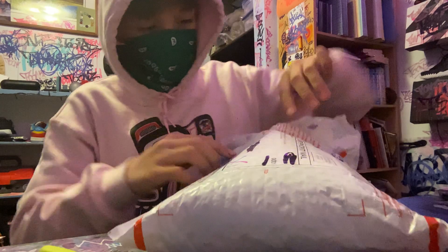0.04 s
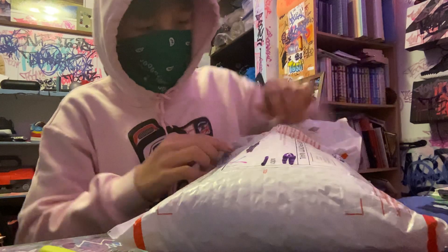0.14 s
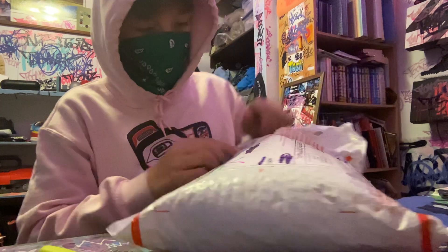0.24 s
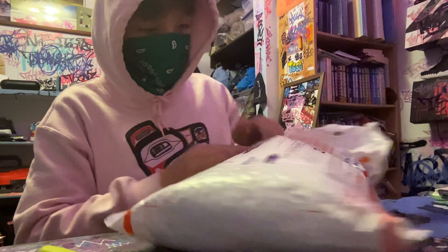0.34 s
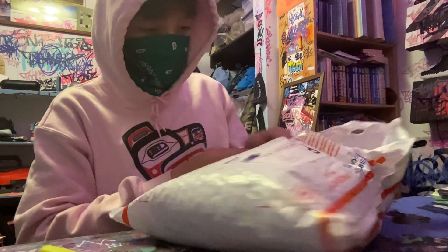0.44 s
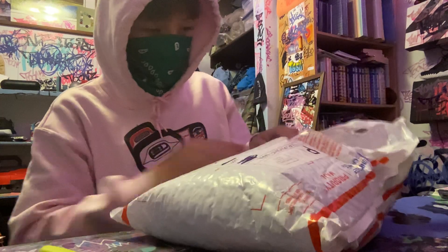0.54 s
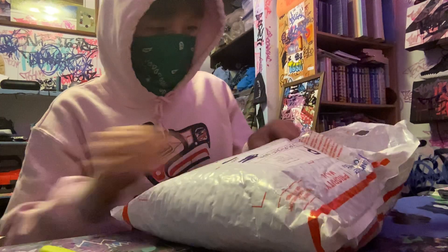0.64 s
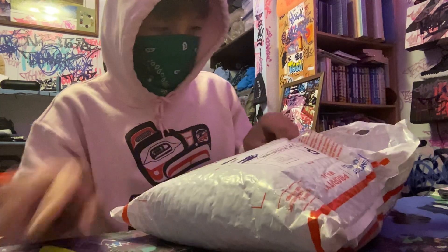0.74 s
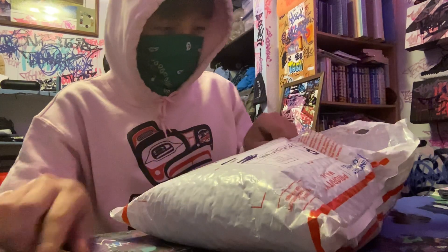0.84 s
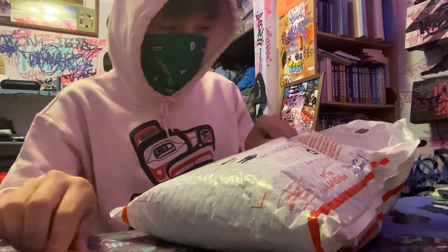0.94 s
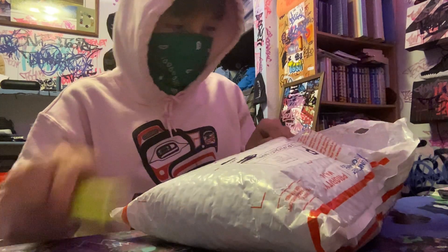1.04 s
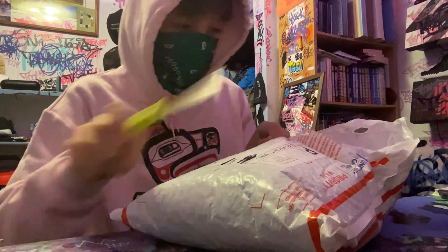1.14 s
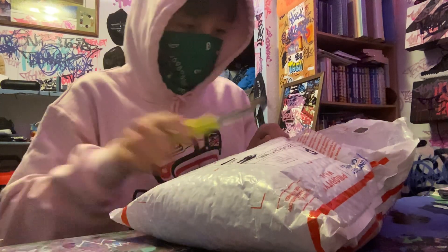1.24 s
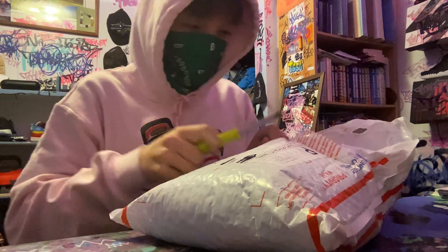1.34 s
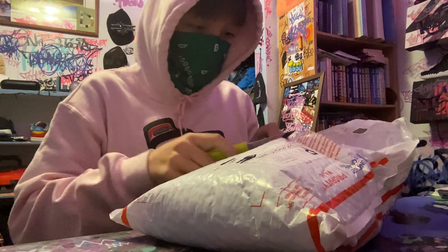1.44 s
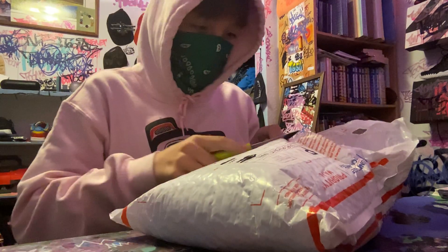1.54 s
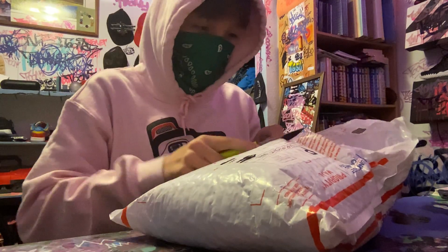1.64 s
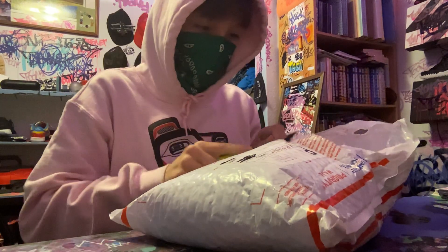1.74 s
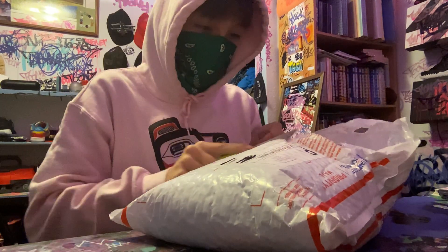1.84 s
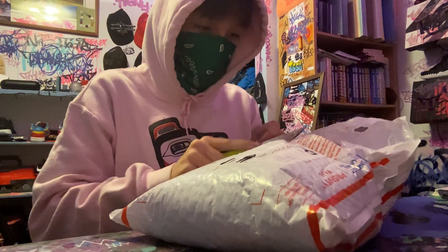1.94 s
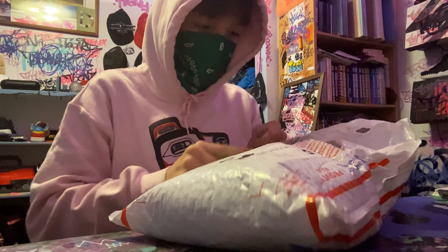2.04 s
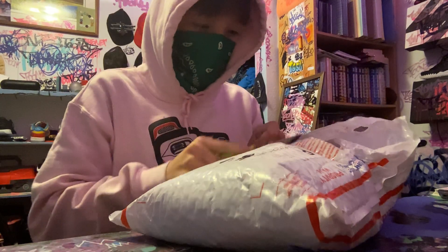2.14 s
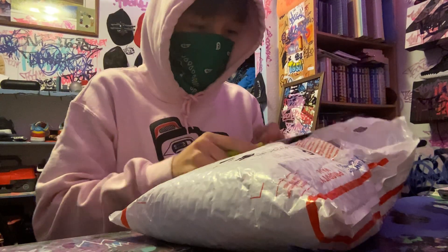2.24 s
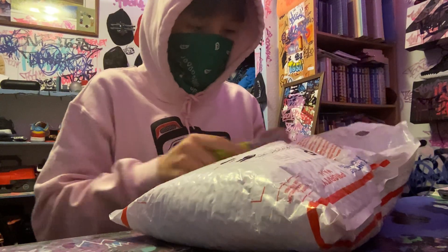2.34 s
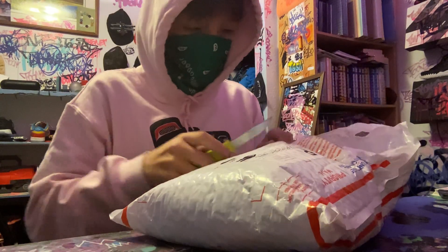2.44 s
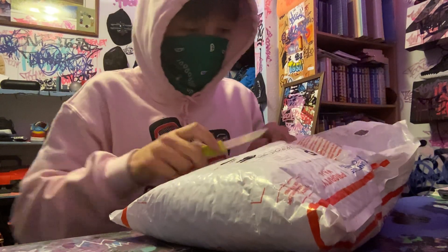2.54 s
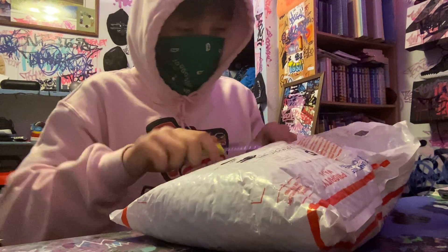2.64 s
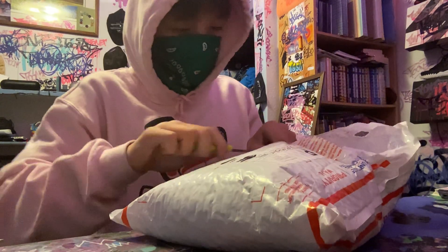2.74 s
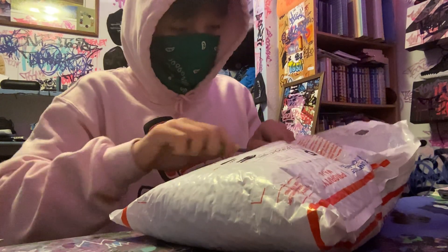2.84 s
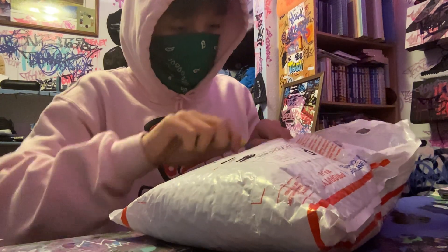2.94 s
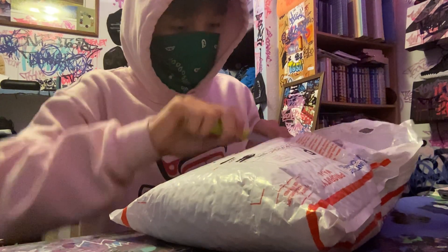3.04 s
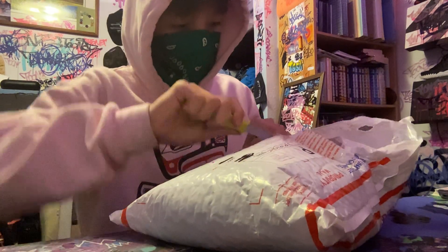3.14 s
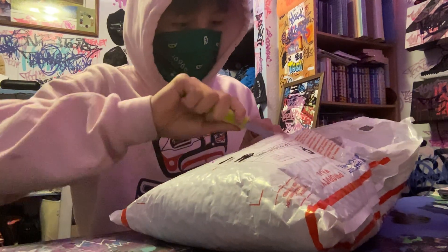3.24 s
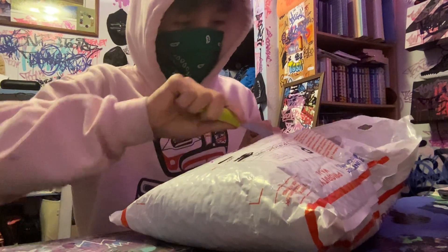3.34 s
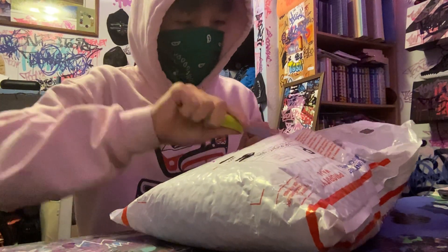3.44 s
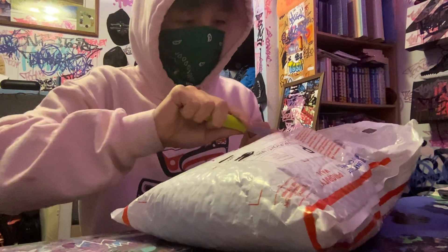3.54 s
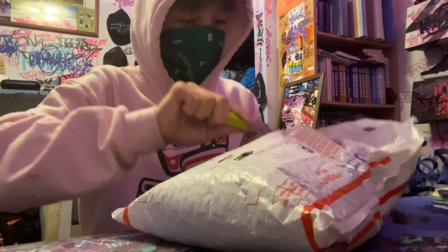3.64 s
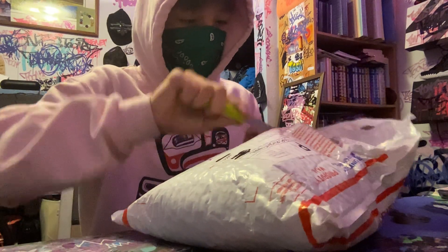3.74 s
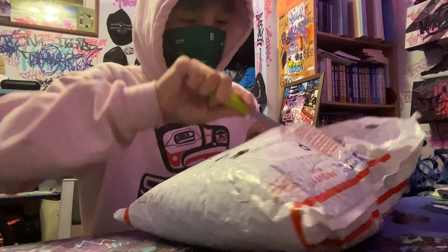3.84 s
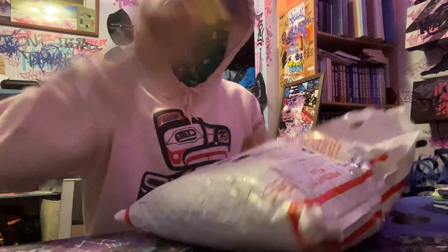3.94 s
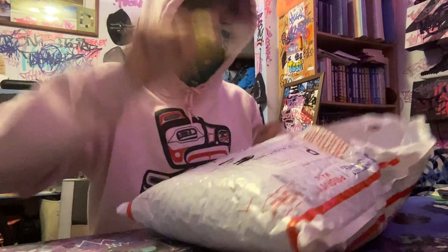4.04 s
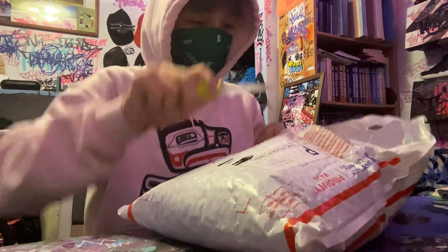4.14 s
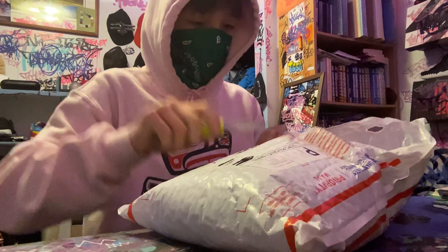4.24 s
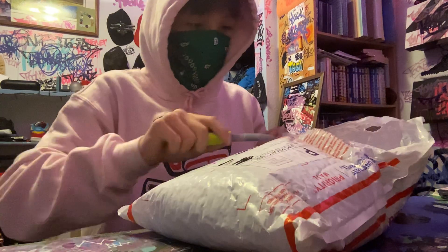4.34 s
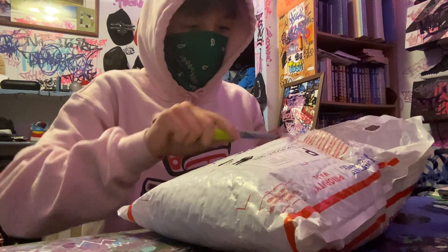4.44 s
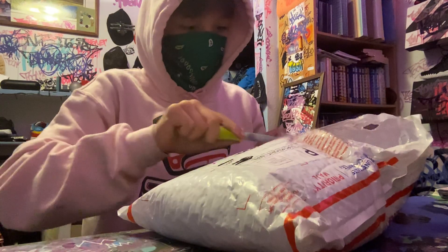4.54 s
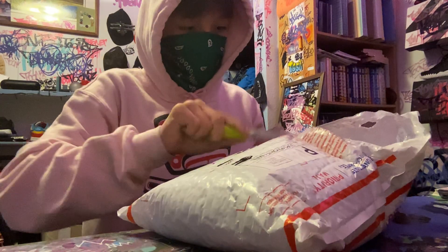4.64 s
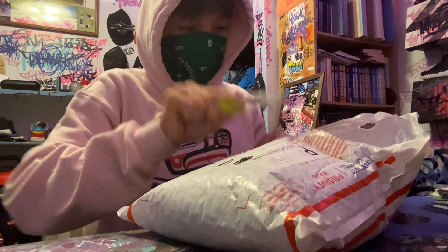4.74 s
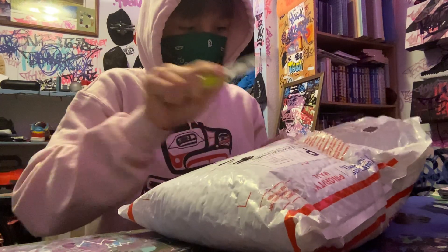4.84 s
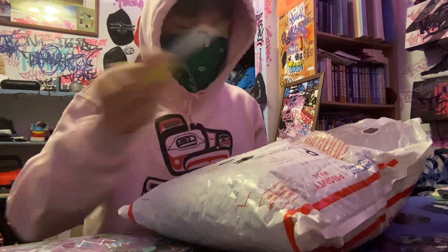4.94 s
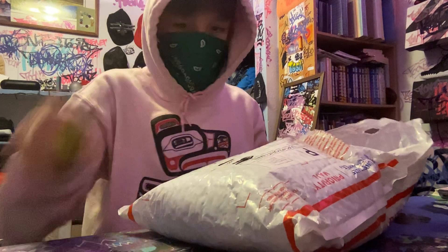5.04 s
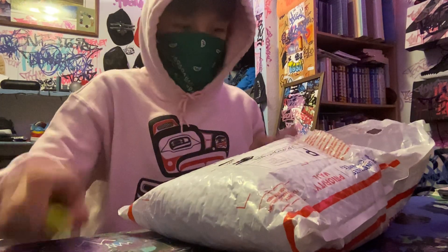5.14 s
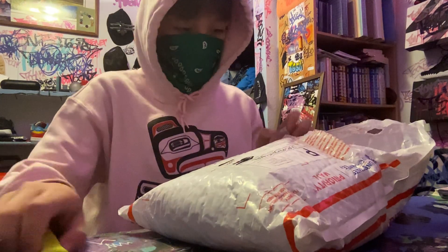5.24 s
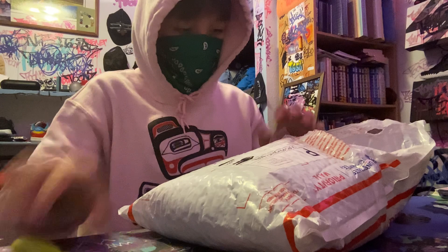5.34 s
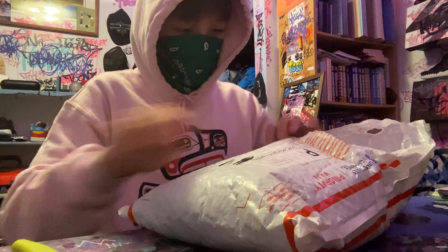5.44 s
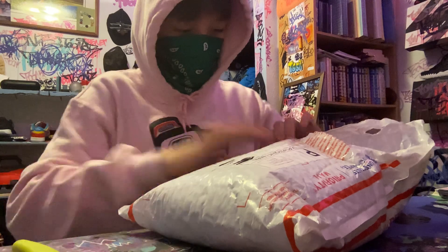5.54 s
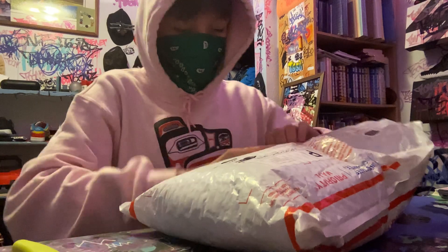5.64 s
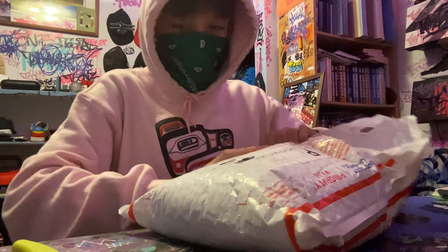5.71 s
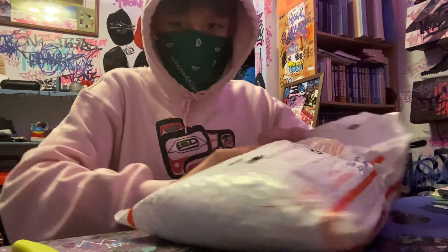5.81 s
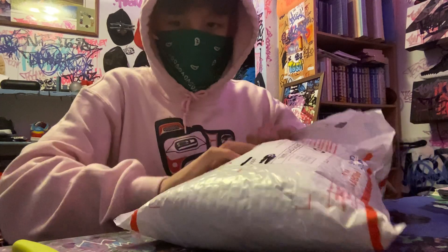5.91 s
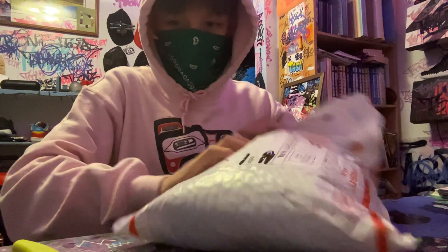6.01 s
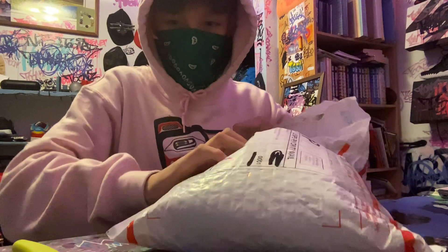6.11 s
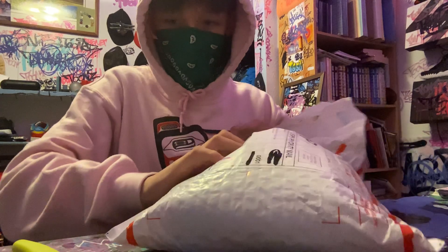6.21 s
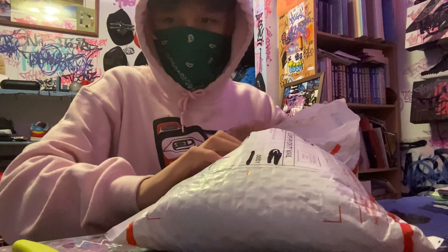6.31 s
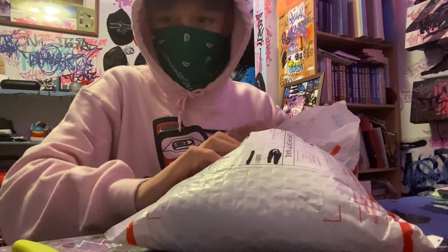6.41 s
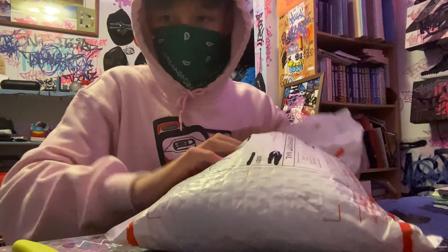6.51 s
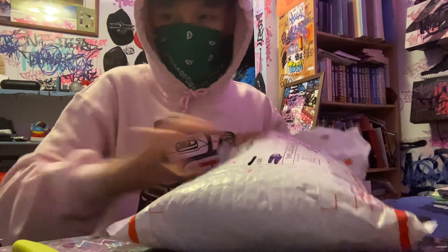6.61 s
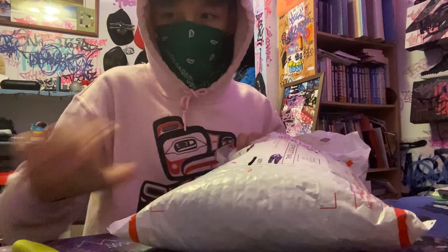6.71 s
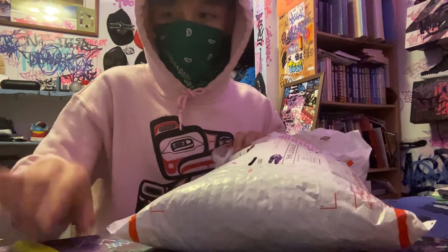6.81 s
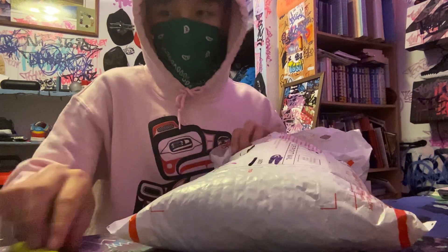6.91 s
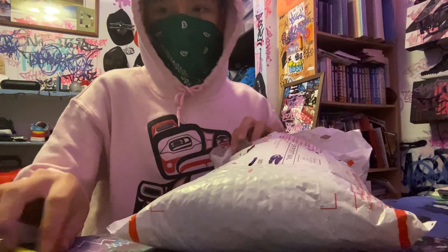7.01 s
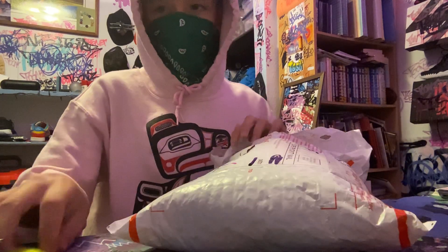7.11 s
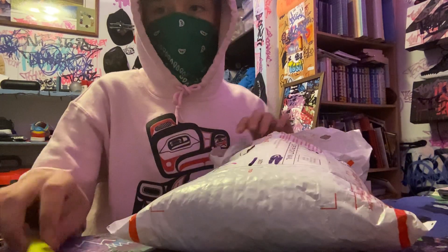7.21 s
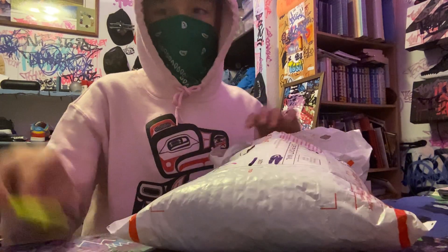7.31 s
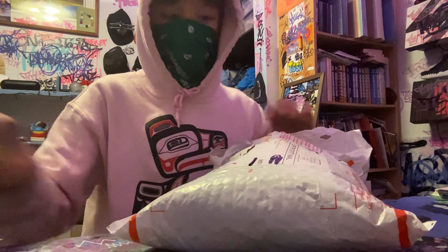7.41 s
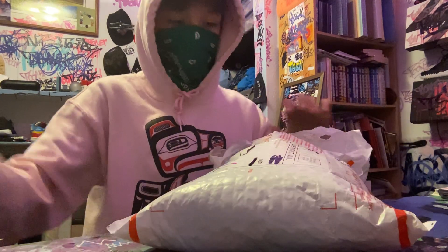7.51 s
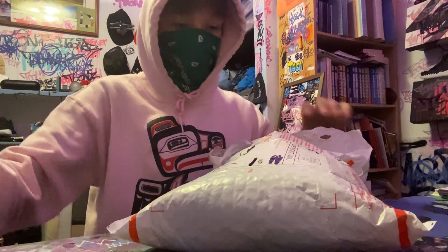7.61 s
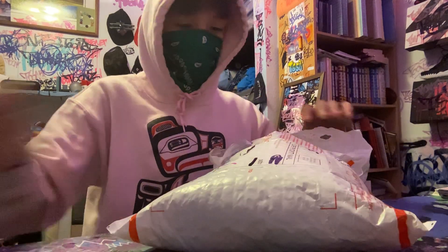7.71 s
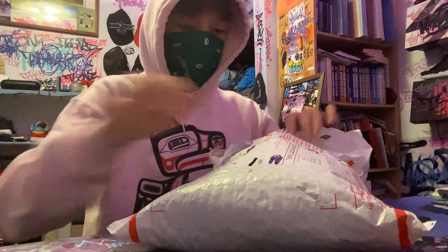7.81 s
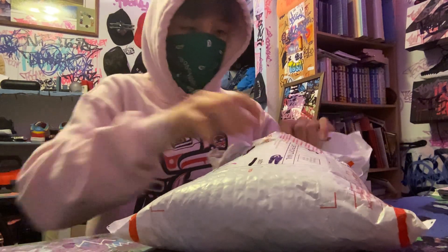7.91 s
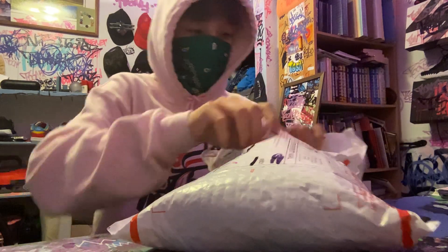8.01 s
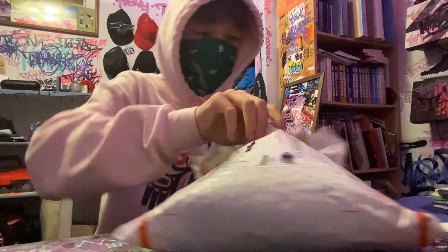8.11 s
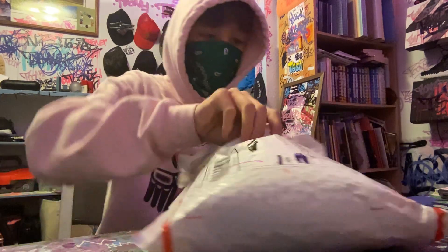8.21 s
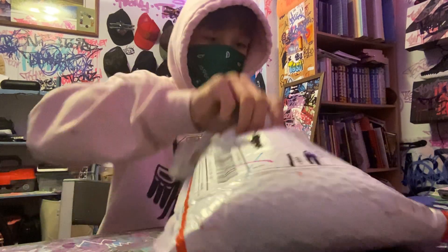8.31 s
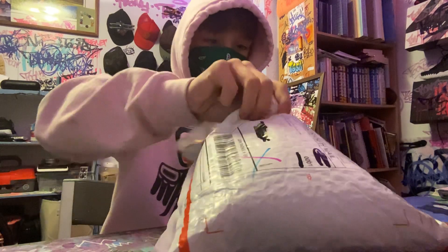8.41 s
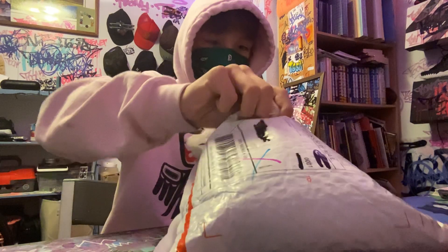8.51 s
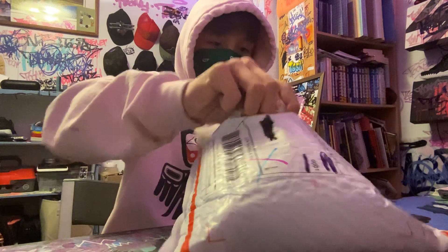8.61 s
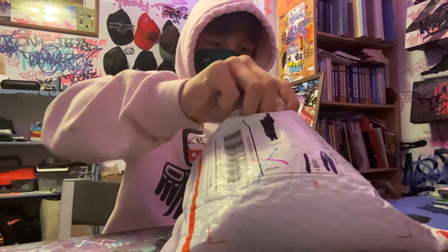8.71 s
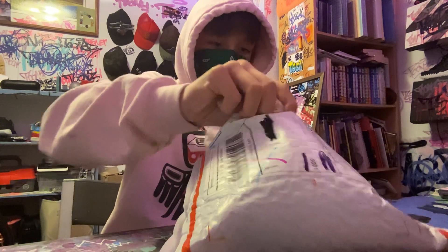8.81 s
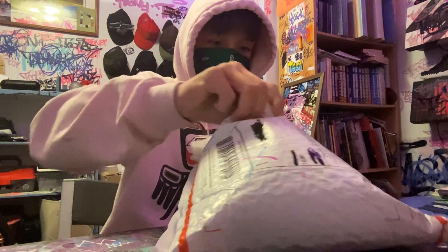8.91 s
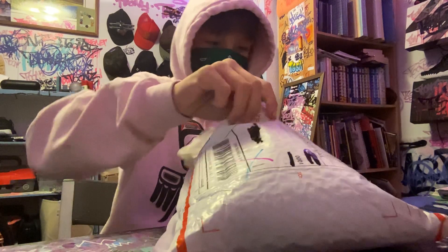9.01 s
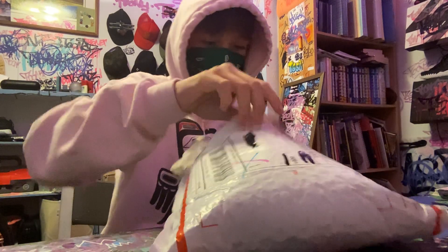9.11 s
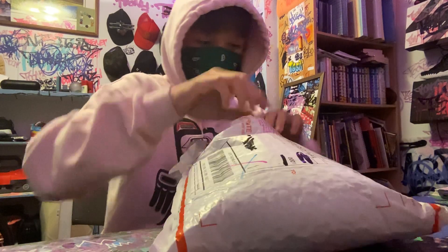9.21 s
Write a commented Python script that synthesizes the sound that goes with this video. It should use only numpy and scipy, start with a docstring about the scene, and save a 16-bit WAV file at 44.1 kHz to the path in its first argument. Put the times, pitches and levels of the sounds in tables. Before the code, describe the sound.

A padded plastic mailer crinkles and snaps under handling on a desk, a knife clatters down, then the film is pulled in louder crackling bursts.

```python
"""A padded plastic mailer is handled on a desk in a small room, close to the microphone.
Its film crinkles as many tiny ringing buckles, snaps in noise bursts, hisses under strokes and knocks.
A knife clatters on the desk as cracks with blurred rings, then slides and scrapes in shaped noise.
Soft landings boom in the desk top; room reflections and a faint steady air noise lie behind."""
import sys
import numpy as np
from scipy import signal
from scipy.fft import rfft, irfft, next_fast_len
from scipy.io import wavfile
from scipy.ndimage import map_coordinates

SR = 44100
rng = np.random.default_rng(int(sys.argv[2]) if len(sys.argv) > 2 else 0)


def master_out(mix):
    """Clip the mix to full scale and print it as 16-bit PCM to the path in sys.argv[1]."""
    frames = np.transpose(np.atleast_2d(mix))
    ceiling = np.clip(frames, -1, 1)
    pcm = np.round(ceiling * 32767).astype(np.int16)
    wavfile.write(sys.argv[1], SR, pcm)


N = 408366
TIME = np.arange(N) / SR
TOP_HZ = 16200  # upper band limit

# Hand or knife briefly pressing the film: [start t/s, length t/s, crinkle drive level/dB, treble re drive level/dB]
GRIPS = [(0, .13, -43, -2), (0.203, 0.37, -43, -5), (0.787, 0.029, -44, -6.5), (1.709, .23, -46, -5.5),
         (1.997, 0.052, -41, -2.5), (2.16, 0.27, -47.5, -5.5), (2.849, 0.24, -53.5, -0.5),
         (3.449, 0.035, -42, 3), (3.611, 0.23, -48, -2), (3.91, .18, -35, -4), (4.227, .43, -51.5, -4.5),
         (4.895, 0.12, -51.5, -5), (5.112, 0.15, -48.5, -2), (6.243, 0.22, -42, -5),
         (6.527, 0.13, -36.5, -5), (6.83, 0.18, -56, -3), (7.124, 0.03, -53.5, 13)]
# Film pulled ever tighter: [start t/s, length t/s, final drive level/dB, treble re drive level/dB]
TUGS = [(5.593, 0.35, -32, -4.5), (6.017, 0.024, -22.5, -3.5), (7.887, 0.14, -42, -5.5),
        (8.005, 0.15, -34.5, 0.5), (8.2, 0.19, -29.5, -2.5), (8.435, 0.25, -27.5, -3.5),
        (8.751, 0.046, -31, -7), (8.864, .11, -34, -5.5), (9.024, 0.13, -39.5, -1)]
# Creases popping through and film giving way: [t/s, level/dB, colour f/Hz, t60 t/s (short tick, long crunch)]
SNAPS = [(.199, -37, 2650, 0.012), (.466, -29.5, 2000, 0.012), (.498, -33.5, 3700, 0.012),
         (1.351, -45.5, 2550, .04), (1.712, -38.5, 3900, .023), (1.864, -36.5, 3030, 0.048),
         (2.058, -30, 3150, 0.018), (2.333, -37.5, 3200, 0.12), (2.421, -40, 3770, .04),
         (2.51, -32.5, 2900, 0.017), (2.764, -40.5, 4500, .033), (3.423, -29, 2700, .046),
         (3.766, -31.5, 2200, 0.03), (3.897, -23, 1910, 0.028), (3.907, -15, 1766, 0.026),
         (4.147, -26.5, 2510, 0.02), (4.334, -35.5, 2030, 0.033), (4.51, -38.5, 2080, .02),
         (4.569, -31, 1780, 0.023), (6.013, -25, 1690, .05), (6.28, -29.5, 2780, 0.021),
         (7.51, -39.5, 2200, 0.037), (7.924, -30, 1500, 0.053), (7.978, -29, 1790, 0.033),
         (8.392, -17, 2080, 0.027), (8.5536, -26, 3420, .006), (8.6117, -24.5, 2970, .01),
         (8.795, -23, 1780, .014), (8.9128, -26, 4200, 0.0057), (8.928, -23.5, 2430, .0085),
         (9.0909, -26.5, 3160, 0.015), (9.225, -32, 2180, .024)]
# Palm or sleeve stroking the film: [start t/s, length t/s, level at the middle level/dB]
SWISHES = [(0.236, 0.36, -41), (5.68, 0.31, -38.5), (6.541, .14, -34.5)]
# Finger or knife bumping the taut parcel, or a fold flipping over: [t/s, level/dB, centre f/Hz]
KNOCKS = [(.085, -30.5, 1600), (.529, -25.5, 1900), (1.988, -42.5, 1400), (2.016, -36.5, 1600),
          (2.614, -40, 1500), (2.629, -32.5, 750), (2.972, -32, 1920), (3.018, -29, 1630),
          (3.042, -35, 1200), (4.859, -33.5, 1600), (6.323, -24.5, 1400), (7.608, -32, 1650),
          (8.664, -23.5, 1610)]
# Knife meeting the desk, rocking from handle to blade: [t/s, level/dB, hardness as f/Hz, higher is harder]
CONTACTS = [(0.8037, -20, 1070), (5.113, -29.5, 1380), (5.2129, -30, 1430), (5.3066, -13.5, 1330),
            (5.3125, -12.5, 1800), (5.3164, -10.5, 1900), (5.3809, -23, 1180), (5.3885, -11, 1700),
            (5.4378, -19.5, 1350), (5.444, -17, 2170), (5.4625, -18, 1210), (5.487, -20.5, 1090),
            (6.8569, -24.5, 960), (6.863, -25.5, 2000), (7.0676, -15, 1900), (7.149, -27.5, 1200),
            (7.17, -28, 1100), (7.184, -27, 1300), (7.2341, -29, 1040)]
# Blade scraping or tapping: [start t/s, length t/s, level/dB, centre f/Hz]
SCRAPES = [(0.838, 0.058, -39, 3130), (2.508, 0.019, -42, 5660), (2.663, 0.0045, -45.5, 5960),
           (7.112, 0.046, -38.5, 2390)]
# Handle dragged over the desk: [start t/s, length t/s, level/dB, centre f/Hz]
SLIDES = [(0.841, 0.088, -36.5, 810), (6.856, 0.22, -40.5, 760), (7.065, 0.177, -36.5, 820)]
# Hands, knife and parcel landing on the desk: [t/s, level/dB, centre f/Hz]
THUMPS = [(.806, -28.5, 270), (1.215, -49, 330), (3.902, -28.5, 290), (3.986, -35.5, 130),
          (4.235, -45, 280), (5.308, -32.5, 200), (6.015, -35, 278), (6.866, -37.5, 150), (7.619, -42, 170)]

# Resonances of the steel blade: [f/Hz, width f/Hz, relative level/dB]
BLADE_MODES = [(2740, 580, -2.5), (5400, 490, -5.5)]
# Resonances of knife on desk top: [f/Hz, relative level/dB]
KNIFE_MODES = [(712, -4), (1059, 1.5), (1156, 3), (1340, -4), (1820, -1), (2070, -1), (2960, -5)]
# Resonances of the desk under a soft weight: [f/Hz, relative level/dB, t60 t/s]
BOOM_MODES = [(88, -2, .16), (143, -4, 0.25), (189.6, -4, 0.23), (308.5, 0.5, 0.091)]

# Spectrum of the crinkling film's body: [f/Hz, relative level/dB]
FILM = [(100, -31.5), (400, 0.5), (620, -12), (1000, 4.5), (1450, -2), (2100, 2.5), (3800, -4), (7000, -22),
        (16000, -27.5)]
# Spectrum of the film's treble: [f/Hz, relative level/dB]
FIZZ = [(1500, -5.5), (3800, 6), (5800, 7), (9500, -3.5), (16000, -14)]
# Spectrum of a snapping crease: [f/Hz, relative level/dB]
SNAP = [(150, -4), (1000, 5.5), (2200, 3.5), (4000, -4), (6000, -2.5), (16000, -12)]
# Spectrum of a bump on the taut parcel: [f/Hz, relative level/dB]
TAUT = [(100, -1), (450, 3), (1100, 5), (1600, -1.5), (2300, 1), (5000, -12), (13000, -35)]
# Spectrum of the knife on the desk: [f/Hz, relative level/dB]
KNOCK = [(100, -22), (450, 4), (950, 7), (1550, 0), (1950, 7), (3300, 0), (5200, -7), (16000, -54.5)]
# Spectrum of hollow rumble in stuffing and desk: [f/Hz, relative level/dB]
HOLLOW = [(55, -10), (95, -2.5), (160, -1.5), (420, -2), (620, -10), (1500, -45.5)]
# Spectrum of the background air: [f/Hz, relative level/dB]
AIR = [(60, -2), (1000, -8), (5000, -21), (16000, -43)]
# Decay of the room: [f/Hz, t60 t/s]
ROOM = [(150, 1), (1000, 0.19), (3000, 0.18), (9000, 0.23)]

GRIP_ATTACK_S, GRIP_RELEASE_S = 0.11, 0.29  # time to rise and to fall by 60 dB
TUG_DB_PER_S = 33.5  # growth of the crinkle with the tension
BED_DB, BED_TREBLE_DB = -60.5, -1.5  # quiet bed of crinkle under the moves
BED_DROP_S, BED_DROP_DB = 7.26, -18.5  # the quiet bed drops by this much here and stays lower
# a finger sticks and slips over the taut film in one quick run of knocks
JUDDER_S, JUDDER_GAP_S, JUDDER_DB, JUDDER_HZ = 6.3965, .0072, -14, 1500


def held(start, length):
    """Gain in dB of one move of the hand: quick attack, hold, and a release as the film relaxes."""
    before = np.maximum(start - TIME, 0) / GRIP_ATTACK_S
    after = np.maximum(TIME - start - length, 0) / GRIP_RELEASE_S
    return -60 * np.minimum(before + after, 2)


def handling():
    """Drive of the film in dB, body and treble: the quiet bed, grips and tugs add up in power."""
    bed_db = BED_DB + np.maximum(held(0, BED_DROP_S), BED_DROP_DB)
    moves = [(bed_db, BED_TREBLE_DB)]
    for start, length, db, treble in GRIPS:
        moves.append((db + held(start, length), treble))
    for start, length, db, treble in TUGS:
        slack_db = TUG_DB_PER_S * np.maximum(start + length - TIME, 0)
        moves.append((db - slack_db + held(start, length), treble))
    body = summed([db for db, _ in moves])
    return body, summed([db + treble for db, treble in moves])


def crinkle(level, treble, life=0.0027, spread_db=7, rub=0.72, body_db=-1, fizz_db=-1, count=3):
    """Tiny buckles run through the film in clumps; harder work makes them louder and denser."""
    rate = np.minimum(800 * amp(.7 * (level + 45.5) + 6 * wobble(50)), 3000)  # buckles a second
    pushes = grains(rate, spread_db)
    at = np.flatnonzero(pushes)
    k = np.arange(SR // 220)
    pops = np.zeros(N)
    for _ in range(count):
        # every buckle rings a few small facets for a few milliseconds, each at its own pitch
        hz = 700 * (TOP_HZ / 700) ** rng.random(N)[at, None]
        t60 = life * np.sqrt(TOP_HZ / hz)  # larger, lower facets ring longer
        tone = np.sin(2 * np.pi * hz * k / SR)
        ring = pushes[at, None] * np.sqrt(hz) * tone * amp(-60 * k / SR / t60)
        pops += np.bincount((at[:, None] + k).ravel(), ring.ravel(), N)[:N]
    # fingers and sleeves rubbing the film fill the gaps between buckles
    film = unit(pops) + rub * rng.standard_normal(N)
    body = unit(coloured(film, lambda f: along(FILM, f)))
    fizz = unit(coloured(film, lambda f: along(FIZZ, f)))
    body_gain = amp(level + body_db + 2.52 * wobble(35))
    fizz_gain = amp(treble + fizz_db + 3.2 * wobble(35))
    return amp(1.3 * wobble(22)) * (body_gain * body + fizz_gain * fizz)


def snaps(settle=0.066, settle_db=-17, slope_db=8, ripple_db=3):
    """A crease pops through with a colour of its own, and the film around it settles in smaller ticks."""
    out, t = np.zeros(N), np.arange(SR // 12) / SR
    bands = np.geomspace(SNAP[0][0], TOP_HZ, num=20)
    for s, db, hz, life in SNAPS:
        burst, ticks = rng.standard_normal((2, len(t)))
        crease = np.column_stack([bands, ripple_db * rng.standard_normal(len(bands))])
        # cubing the noise leaves sparse ticks
        settling = unit(ticks ** 3) * np.sqrt(life / settle) * amp(settle_db - 60 * t / settle)
        pop = burst * amp(-60 * t / life) + settling
        colour = lambda f: along(SNAP, f) + along(crease, f) + hump(f, hz * hz / 2200, slope_db)
        add(out, s, blow(coloured(pop, colour), db))
    return out


def judder(count=8, scatter_s=.0011):
    """The uneven slips of a dragging finger as (t/s, level/dB, f/Hz): they build fast and peter out."""
    k = np.arange(count)
    strength = np.sin(np.pi * ((k + .5) / count) ** 0.68)
    scatter = scatter_s * np.sqrt(k / count) * rng.standard_normal(count)
    times = JUDDER_S + JUDDER_GAP_S * k + scatter
    return [(s, JUDDER_DB + 20 * np.log10(a), JUDDER_HZ) for s, a in zip(times, strength)]


def knocks(echo_s=.0028, echo_db=-5, stuffing_db=-32, t60=.1, slope_db=8):
    """A broad, unpitched knock; the desk throws it straight back and the stuffing shivers."""
    out, t = np.zeros(N), np.arange(SR // 8) / SR
    for s, db, hz in KNOCKS + judder():
        push = (t == 0) + amp(stuffing_db - 60 * t / t60) * rng.standard_normal(len(t))
        add(push, echo_s * amp(2 * rng.normal()), amp([echo_db]))  # the delay varies about echo_s
        knock = coloured(push, lambda f: along(TAUT, f) + hump(f, hz, slope_db))
        add(out, s, blow(knock, db))
    return out


def swishes(treble_db=-14):
    """Sliding over the film gives a fine, even hiss that swells and fades with the stroke."""
    out = np.zeros(N)
    colour = lambda f: summed([along(FILM, f), along(FIZZ, f) + treble_db])
    for s, length, db in SWISHES:
        hiss = unit(coloured(rng.standard_normal(round(length * SR)), colour))
        add(out, s, amp(db) * hiss * signal.windows.cosine(len(hiss)))
    return out


def padding(level, low_db=-54.5, follow=0.5):
    """The stuffed parcel rumbles softly as it is pushed about, following half the film's dB swing."""
    rumble = unit(coloured(grains(420, spread_db=5.5), lambda f: along(HOLLOW, f)))
    return rumble * amp(low_db + follow * (level + 47.0))


def knife(chatter_db=-26, chatter_t60=.06, ring_db=-40, ring_t60=0.12, slope_db=9, detune=.007, blur_hz=35):
    """Each contact cracks, chatters and rings knife and desk; hard contacts are brighter and cleaner."""
    out, t = np.zeros(N), np.arange(SR // 5) / SR
    for s, db, hz in CONTACTS:
        ring = np.zeros(len(t))
        for f, level in KNIFE_MODES:
            # the loose knife buzzes on the wood, which blurs each ring
            drift = np.cumsum(rng.standard_normal(len(t))) * np.sqrt(2 * np.pi * blur_hz / SR)
            a, b = rng.standard_normal(2)
            decay = amp(level + 2 * a - 60 * t * f / 1000 / ring_t60)  # ring_t60 holds at 1 kHz
            ring += decay * np.sin(2 * np.pi * f * (1 + detune * b) * t + drift)
        hardness = hz / 1500
        chatter = unit(rng.laplace(size=len(t))) * amp(chatter_db - 60 * t / chatter_t60) / hardness
        crack = (t == 0) + chatter + amp(ring_db) * ring
        hit = coloured(crack, lambda f: along(KNOCK, f) + hump(f, hz * hardness, slope_db))
        add(out, s, blow(hit, db))
    return out


def slides(slope_db=30, rumble_db=-31):
    """The handle sticks and slips over the desk, which rumbles under it."""
    out = np.zeros(N)
    for s, length, db, hz in SLIDES:
        slips = grains(980, spread_db=2.5)[:round(length * SR)]
        handle = lambda f: along(KNOCK, f) + hump(f, hz, slope_db)
        colour = lambda f: summed([handle(f), along(HOLLOW, f) + rumble_db])
        scrape = unit(coloured(slips, colour))
        add(out, s, amp(db) * scrape * signal.windows.tukey(len(scrape), .5))
    return out


def blade(slope_db=22, t60=0.06):
    """Fine slips ring the blade in its own narrow bands, and the ring dies once the contact ends."""
    out, t = np.zeros(N), np.arange(SR // 5) / SR

    def steel(f):
        """Resonance peaks of the blade in dB."""
        return summed([db - 20 * np.log10(1 + ((f - centre) / width) ** 2)
                       for centre, width, db in BLADE_MODES])

    for s, length, db, hz in SCRAPES:
        ring = unit(coloured(rng.standard_normal(len(t)), lambda f: steel(f) + hump(f, hz, slope_db)))
        add(out, s, ring * amp(db - 60 * np.maximum(t - length, 0) / t60))
    return out


def thumps(t60=0.22, rise=0.0043, ring_db=-3.5, slope_db=9, spread_db=2):
    """Soft weight on the desk gives a dull push and a short hollow boom, with its own centre pitch."""
    out, t = np.zeros(N), np.arange(SR // 3) / SR
    for s, db, hz in THUMPS:
        noise = rng.standard_normal(len(t))
        push = unit(coloured(noise, lambda f: along(HOLLOW, f))) * amp(-60 * t / t60)
        ring = np.zeros(len(t))
        for f, level, life in BOOM_MODES:
            decay = amp(level + spread_db * rng.normal() - 60 * t / life)
            ring += decay * np.sin(2 * np.pi * (f * t + rng.random()))
        landing = (push + amp(ring_db) * ring) * (1 - np.exp(-t / rise))
        boom = coloured(landing, lambda f: hump(f, hz, slope_db))
        add(out, s, blow(boom, db, size=1500))
    return out


def bent(x, lag, corner_hz=650):
    """Bending waves are slower at low pitch (by up to lag seconds), so ticks droop from high to low."""
    size = next_fast_len(N + SR // 2)
    phase = 2 * np.pi * lag * corner_hz * np.log1p(np.fft.rfftfreq(size, 1 / SR) / corner_hz)
    return irfft(rfft(x, size) * np.exp(-1j * phase), size)[:N]


def room(x, wet_db, early_db, count=7, size=8192):
    """Near surfaces and a diffuse tail answer; new random paths crossfade in every size samples."""
    out, window = np.zeros(N + size), signal.windows.hann(2 * size, sym=False)
    padded = np.pad(x, (size, 2 * size))
    for start in range(0, N + size, size):
        hz, t, z = signal.stft(rng.standard_normal(SR // 2), SR, nperseg=256)
        decay = amp(-60 * t / along(ROOM, hz)[:, None])
        tail = signal.istft(z * decay, SR, nperseg=256)[1]
        answer = np.pad(amp(wet_db) * tail / np.linalg.norm(tail), (SR // 200, 0))  # tail after 5 ms
        for delay in rng.uniform(0.0046, .02, count):
            add(answer, delay, amp([early_db - 300 * delay]) * rng.choice([-1, 1]))
        block = padded[start:start + 2 * size] * window
        add(out, start / SR, signal.fftconvolve(block, answer))
    return x + out[size:]


def background_air(level_db=-72.0):
    """Faint steady background: noise that thins towards the treble."""
    return amp(level_db) * unit(coloured(rng.standard_normal(N), lambda f: along(AIR, f)))


def amp(db):
    """Decibels to gain."""
    return 10 ** (np.asarray(db) / 20)


def summed(levels_db):
    """Level in dB of several sounds together, added in power."""
    return 10 * np.log10(np.sum(10 ** (np.array(levels_db) / 10), axis=0))


def unit(x):
    """Scaled to rms 1."""
    return x / np.sqrt(np.mean(x ** 2) + 1e-20)


def along(points, hz):
    """(f/Hz, value) points read on a log frequency axis."""
    f, v = np.transpose(points)
    return np.interp(np.log(hz + 1), np.log(f), v)


def hump(hz, centre, slope_db):
    """A broad rise around a centre, falling by slope_db an octave far from it."""
    return -slope_db * np.hypot(np.log2((hz + 1) / centre), 1)


def coloured(x, gain_db):
    """x through a causal (minimum-phase) filter whose dB response is a function of Hz."""
    size = 2 * next_fast_len(len(x) // 2 + 1024)
    cepstrum = irfft(np.log(amp(gain_db(np.fft.rfftfreq(size, 1 / SR))) + 1e-6))
    # folding the cepstrum onto positive time makes the filter causal
    cepstrum[1:size // 2] *= 2
    cepstrum[size // 2 + 1:] = 0
    return irfft(rfft(x, size) * np.exp(rfft(cepstrum)))[:len(x)]


def wobble(rate):
    """A smooth random curve with rate knots a second."""
    return map_coordinates(rng.standard_normal(int(N * rate / SR) + 4), [TIME * rate])


def grains(rate, spread_db):
    """Random impulses of uneven size, rate a second, with mean power 1."""
    hit = rng.random(N) < rate / SR
    size = unit(amp(spread_db * np.clip(rng.standard_normal(N), -2, 2)))
    return hit * size * rng.choice([-1, 1], N) * np.sqrt(SR / rate)


def blow(x, db, size=176):
    """A hit scaled so that its first size samples have the given rms level."""
    return x * amp(db) / np.sqrt(np.mean(x[:size] ** 2))


def add(track, s, sound):
    """Mixes a sound in at a time in seconds."""
    part = track[round(s * SR):][:len(sound)]
    part += sound[:len(part)]


def scene():
    """Parcel, knife and desk in the room, over its faint background."""
    level, treble = handling()
    film = bent(crinkle(level, treble) + snaps(), lag=0.002795)
    film += bent(knocks(), lag=0.02602, corner_hz=99.3) + swishes()
    parcel = room(film + padding(level) + thumps(), wet_db=-10.5, early_db=-22.0)
    clatter = bent(knife(), lag=0.01284, corner_hz=101)
    desk = room(clatter + slides() + blade(), wet_db=-10.0, early_db=-18.5)
    return (parcel + desk + background_air())[None]


def record(dry, low_hz=52):
    """The microphone sheds the deepest bass; the recorder rounds high peaks and cuts above TOP_HZ."""
    highpass = signal.butter(7, low_hz, "highpass", fs=SR, output="sos")
    rounded = np.tanh(signal.sosfilt(highpass, dry))
    size = next_fast_len(N + SR // 2)
    passed = np.fft.rfftfreq(size, 1 / SR) < TOP_HZ
    return irfft(rfft(rounded, size) * passed, size)[:, :N]


dry = scene()
out = record(dry)
master_out(out)
```